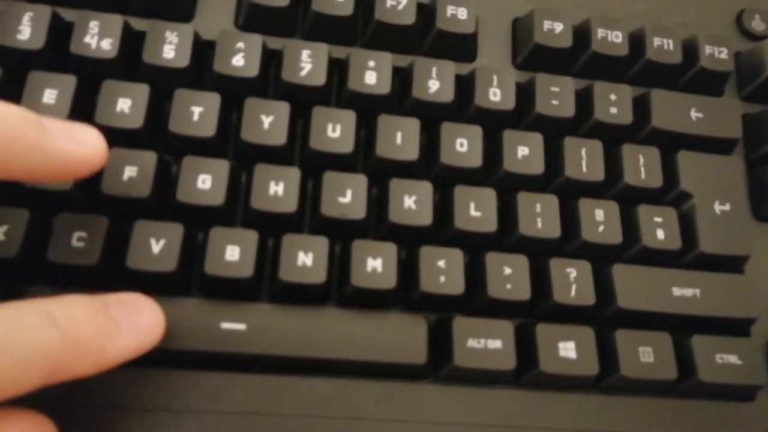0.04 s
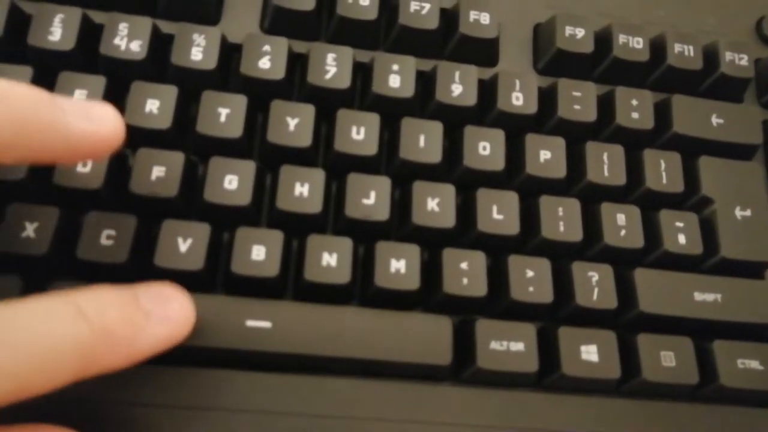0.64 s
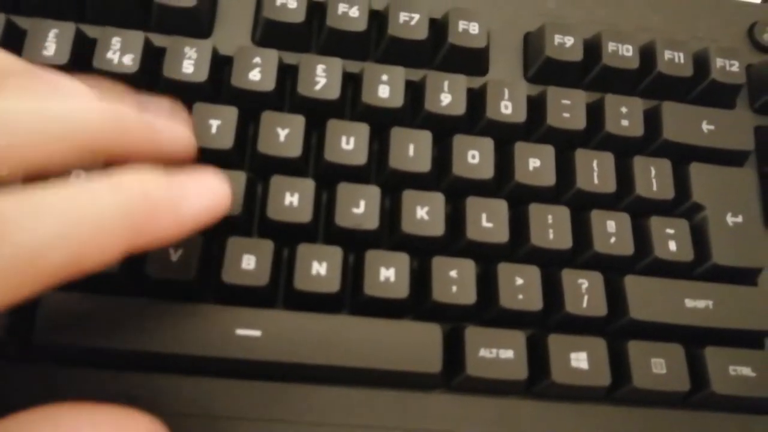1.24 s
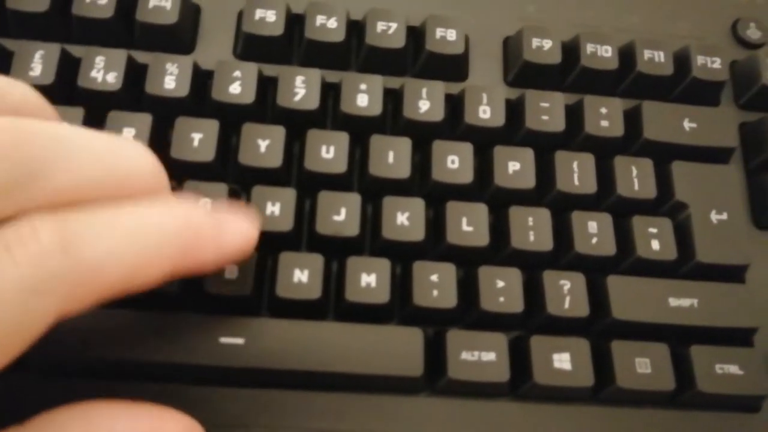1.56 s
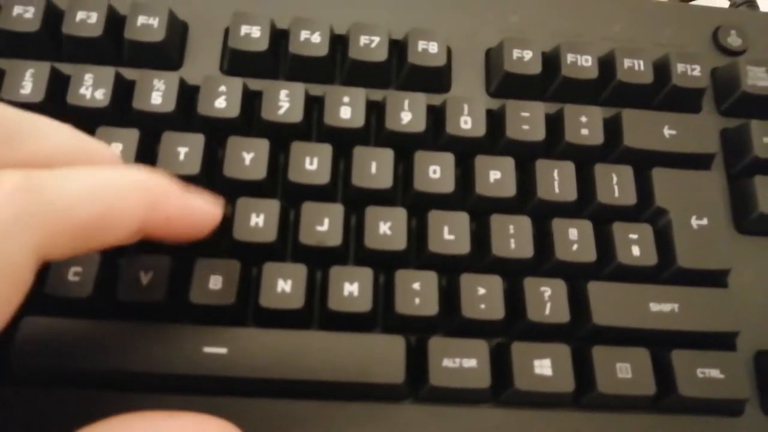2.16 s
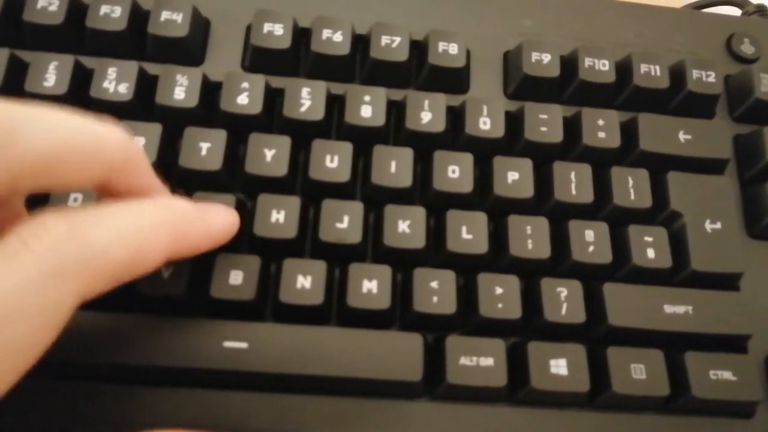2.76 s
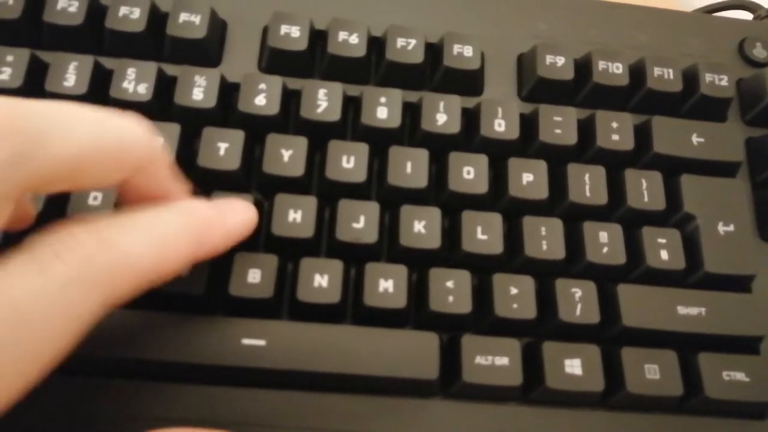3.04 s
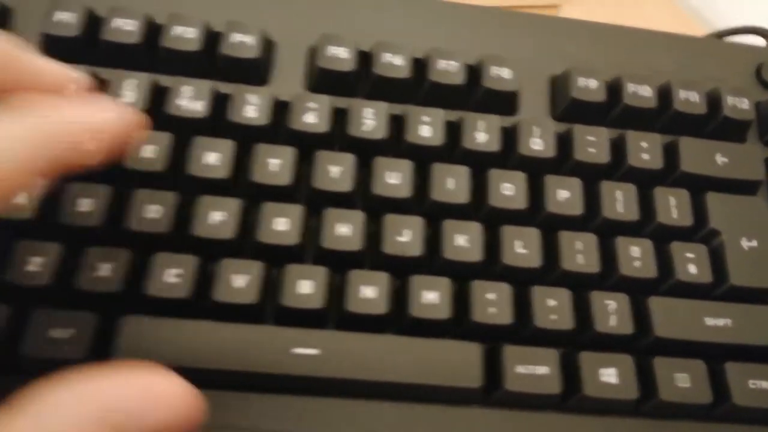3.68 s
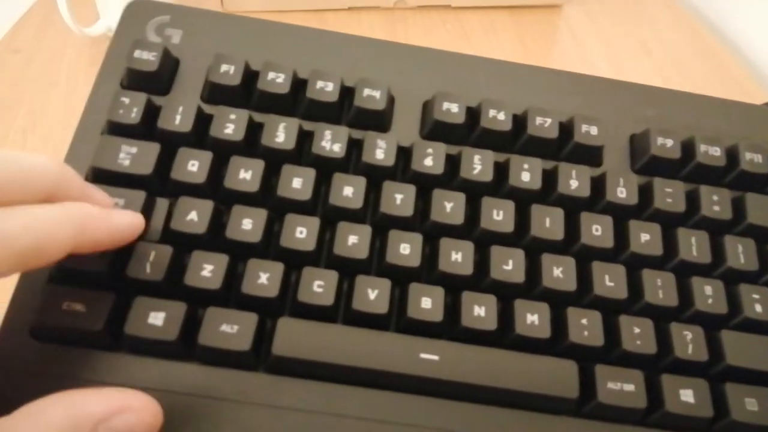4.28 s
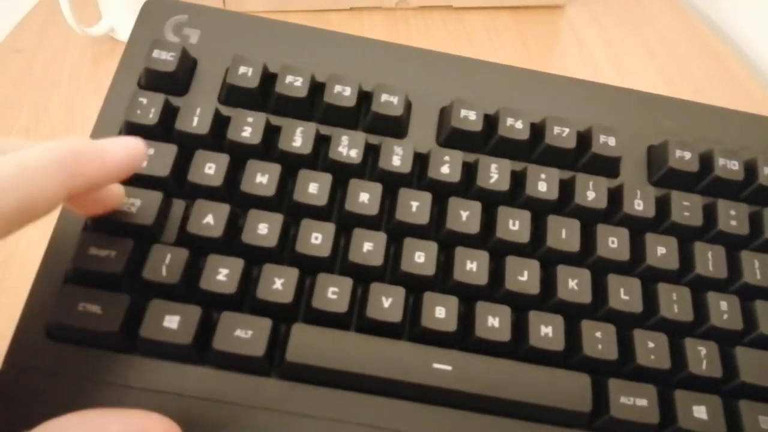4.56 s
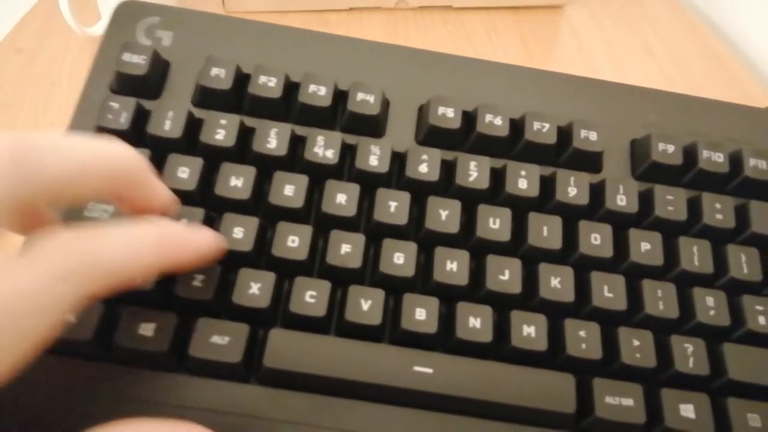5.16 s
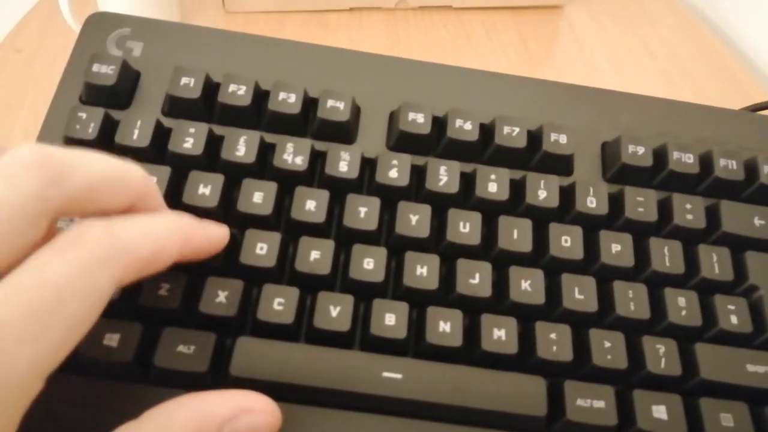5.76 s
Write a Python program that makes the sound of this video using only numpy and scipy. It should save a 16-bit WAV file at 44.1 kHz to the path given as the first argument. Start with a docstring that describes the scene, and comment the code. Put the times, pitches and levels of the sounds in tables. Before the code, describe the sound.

One hand types on a plastic computer keyboard, close to a hand-held microphone in a quiet room. From the start until about 1.2 seconds, the space bar is tapped seven times at an even pace: each stroke is a soft finger thud, then a hollow clack with a tiny wire rattle as the bar snaps up. From 1.4 to 3.7 seconds comes a fast, uneven run of letter keys, each press and release giving a light plastic click and a small knock. After a short pause, a few slower, duller keys sound from about 4.2 to 5.2 seconds, with one low thud near 4.7 seconds, light finger scuffs and a soft rumble from handling the microphone. A couple of faint clicks follow around 5.7 seconds. Throughout, the room gives a slight, short echo over a low steady hiss.

```python
"""One hand typing on a plastic keyboard, close to a hand-held camera in a quiet room.
First seven even space bar clacks: a finger thud, then the hollow bar snaps up and its wire rattles.
From 1.4 s a fast run of letters: each press and release knocks the case and rings a keycap.
A pause at 3.7 s; from 4.2 s a few duller keys at the board's edge, while the moving camera rumbles.
Throughout, the walls answer faintly over a low hiss."""
import sys
import numpy as np
from scipy import signal
from scipy.fft import rfft, irfft, next_fast_len
from scipy.io import wavfile
from scipy.ndimage import uniform_filter1d

SR = 44100
rng = np.random.default_rng(int(sys.argv[2]) if len(sys.argv) > 2 else 0)


def output_pcm(signal):
    """Save a mono or channel-first signal as 16-bit PCM at the path in sys.argv[1].

    Samples are clipped to [-1, 1] before scaling.
    """
    pcm = np.clip(np.atleast_2d(signal).T, -1, 1) * 32767
    wavfile.write(sys.argv[1], SR, np.round(pcm).astype(np.int16))


N = 256662
PREROLL = SR // 5  # samples; typing starts before t = 0
T = np.arange(2048) / SR  # time axis of one contact, s

# letter key down, and up against its stop: t/s, cap level/dB, knock level/dB, cap f/Hz
PRESSES = [(1.393, -40, -47, 3104), (1.5269, -45.5, -53.5, 3200), (1.6684, -55.5, -52, 3010),
           (1.8662, -52.5, -51, 3150), (1.9609, -35, -37.5, 2560), (2.078, -42.5, -44.5, 3100),
           (2.1564, -41, -39.5, 3140), (2.2327, -49.5, -45, 3240), (2.3478, -36, -44, 2460),
           (2.3549, -43, -41.5, 3140), (2.401, -43.5, -45.5, 2220), (2.5016, -45, -56, 2350),
           (2.5197, -45, -46.5, 3140), (2.5415, -49.5, -54.5, 2060), (2.658, -43, -56, 2560),
           (2.6699, -42.5, -48, 3100), (2.7227, -43.5, -48.5, 3080), (2.824, -36, -50, 2590),
           (2.8362, -41, -48.5, 3140), (2.8927, -49, -52, 2100), (2.9966, -40, -56, 2450),
           (3.0033, -43.5, -46.5, 2960), (3.0571, -49, -53.5, 3330), (3.255, -37, -49.5, 2950),
           (3.2745, -44.5, -47, 3130), (3.3503, -43, -49.5, 2500), (3.363, -38.5, -55, 3110),
           (3.4298, -38.5, -42, 2890), (3.5316, -39.5, -54, 2540), (3.5454, -40, -50, 3040),
           (4.2185, -70, -73, 2980), (4.3958, -53.5, -48.5, 3320), (4.487, -69, -58, 3030),
           (4.572, -55, -46.5, 3180), (4.5988, -51, -47.5, 2400), (4.7281, -47.5, -47, 2370),
           (4.904, -45.5, -40.5, 3070), (5.077, -43.5, -40.5, 3030), (5.528, -70, -92, 3070),
           (5.6781, -60, -55.5, 1810)]
RELEASES = [(1.6749, -45, -43.5, 2960), (1.7836, -35.5, -50, 3000), (2.0674, -40, -50, 2420),
            (2.2547, -34, -46.5, 3000), (2.4354, -40, -47, 3150), (2.5982, -38.5, -50, 3070),
            (2.749, -35.5, -50.5, 3030), (2.9171, -38, -47, 3140), (3.0906, -35, -50.5, 3140),
            (3.1742, -41.5, -48, 2720), (3.4512, -35, -47.5, 3140), (3.643, -33.5, -56.5, 3210),
            (4.6686, -43.5, -45, 2400), (4.829, -42.5, -42, 3050), (4.995, -47.5, -41.5, 2800),
            (5.1922, -38.5, -38.5, 2355), (5.7604, -53.5, -45, 3100)]
# space bar snaps up: t/s, reference level/dB
BAR_CLACKS = [(-.094, -25), (.081, -28.5), (.2565, -25.5), (.4307, -26), (.6073, -28), (.7858, -31.5),
              (.9526, -26.5), (1.1279, -29.5)]
# finger thuds: t/s, peak level/dB, f/Hz
THUDS = [(.001, -52, 208), (0.181, -40, 205), (0.3662, -37.5, 198), (0.54, -38.5, 193), (.7225, -39.5, 191),
         (0.888, -35.5, 200), (1.058, -39.5, 195), (1.961, -49.5, 111), (2.158, -46.5, 190),
         (4.6942, -36, 289)]
# finger lands lightly between clacks: t/s, cap level/dB
LANDINGS = [(0.1598, -46), (0.3252, -52.5), (.506, -45), (.6805, -52), (0.8494, -45), (1.0205, -49)]
# timbre of light contacts: plate, knock and tick level/dB re cap, cap f/Hz
RESET_TIMBRE = (-9, -3, 1.5, 3050.5)
BAR_RESET_TIMBRE = (-4.5, -3, -5.5, 2400.5)
LANDING_TIMBRE = (-30, -8, 2, 3117.5)
SEATING_TIMBRE = (-7, 8.5, -5, 2949.5)
# modes of the keyboard's parts: f/Hz, relative level/dB, t60/s
PLATE_MODES = [(180, -2.5, 0.022), (277, -12.5, 0.045), (364, 4.5, 0.054), (405, -5, 0.07)]
CASE_MODES = [(550, -7.5, 0.037), (696, -13, 0.045), (797.4, 6, .032), (890, -12.5, 0.0043)]
CAP_MODES = [(1245, -7.5, 0.0031), (1495, -11, 0.078), (1918, -3.5, 0.015), (2350, 2, 0.0085),
             (2708, 10, 0.0068), (3090, -3, 0.051)]
SWITCH_MODES = [(4810, -9, 0.035), (5300, 1, 0.015), (5890, -0.5, 0.006), (6280, -12.5, 0.0085),
                (6574, -3.5, 0.021)]
BAR_SHELL_MODES = [(190, -7.5, 0.077), (334, -10, 0.053), (599, -12, 0.069), (656, -1, 0.061),
                   (757, 1.5, 0.025), (990, -9, 0.015)]
BAR_CAP_MODES = [(1334, 16, 0.016), (1810, -26, 0.0023), (2400, 3, 0.026), (3140, 13, 0.023)]
BAR_WIRE_MODES = [(5120, -11, 0.013), (5750, -14, 0.0049), (6100, -8, 0.0063), (6460, -9.5, 0.0055),
                  (6966, 1, 0.0076)]
# fingers slide on caps, grip shifts, skin rubs the camera: t/s, hold/s, relative level/dB
SCUFFS = [(1.64, 0.034, -61), (3.97, 0.16, -91), (4.69, .03, -51.5), (4.75, 0.081, -62.5),
          (5.655, 0.012, -69), (5.735, 0.03, -54.5)]
GRIPS = [(.5, 0.075, -59.5), (.93, 0.052, -51), (1.6, 0.046, -63.5), (3.84, .02, -61.5), (4.29, 0.27, -44),
         (4.93, 0.28, -37.5)]
RUBS = [(4.3, 0.1, -60.5), (4.68, 0.049, -54.5)]
# spectra of scuff, rumble, rub, wall echo, air and microphone hiss: f/Hz, relative level/dB
SCUFF_SPECTRUM = [(100, -31), (400, -2), (900, 6.5), (1700, -2), (2800, 3), (4000, -11), (5500, 2.5),
                  (7500, -6)]
RUMBLE_SPECTRUM = [(12, -5), (24, -7), (38, 2.5), (55, -19), (80, -14), (130, -33.5), (300, -71.5),
                   (1000, -100)]
RUB_SPECTRUM = [(100, -37), (210, -7), (265, 3), (330, -12), (500, -22), (2000, -41)]
ROOM_SPECTRUM = [(150, -2.5), (480, -2), (680, -6), (1050, -2.5), (1700, -0.5), (2900, -2.5), (4000, 0),
                 (7000, 0.5)]
HISS_SPECTRUM = [(15, -24), (25, -20.5), (55, -7), (93, -14), (193, -15.5), (272, -20), (293, -17.5),
                 (465, -22), (814, -23), (897, -30.5), (5570, -38), (8430, -44), (11000, -56.5),
                 (18500, -120)]
# tail decay: f/Hz, t60/s; near 690 Hz the board itself keeps ringing
ROOM_T60 = [(200, .28), (480, .33), (690, .56), (1100, .33), (2800, .34), (7000, .33)]


def keys(contacts, plate_lag_s=0.0021, at_edge_s=4.0):
    """Each contact ticks the switch, rings the cap, knocks the case, then thumps the base plate."""
    t_s, plate_db, knock_db, cap_db, tick_db, cap_hz = columns(contacts)
    force = impact(t_s, chatter=0.77, fade_s=0.0027)
    cap_mode = gain_of(11 - 60 * T / 0.015) * np.cos(2 * np.pi * cap_hz * T)
    plate = ring(PLATE_MODES, force, detune=0.029, dense=2.3, dense_t60_s=0.21, crack=0.14)
    case = ring(CASE_MODES, force, detune=0.077, dense=3.55, dense_t60_s=0.06, crack=0.13)
    cap = ring(CAP_MODES, force, detune=0.03, dense=0.8, dense_t60_s=0.024, crack=0.45, extra=cap_mode)
    tick = ring(SWITCH_MODES, force, detune=0.025, dense=0.85, dense_t60_s=0.024, crack=0.25)
    # duller once the hand is at the board's edge
    knock = np.where(t_s < at_edge_s, band(case, 520, 1300), band(case, 440, 960))
    click = (at_level(knock, knock_db)
             + at_level(band(cap, 1300, 3450), cap_db)
             + at_level(band(tick, 4500, 8500), tick_db))
    thump = at_level(band(plate, 110, 520), plate_db)
    return place(t_s, click) + place(t_s + plate_lag_s, thump)


def stroke(t_s, cap_db, knock_db, cap_hz, tick_rel_db, ordinary_db=-45):
    """Full stroke: the tick follows the cap, the plate follows the overall force."""
    force_db = (cap_db + knock_db) / 2 - ordinary_db
    plate_db = -54 + 0.55 * force_db
    return t_s, plate_db, knock_db, cap_db, cap_db + tick_rel_db, cap_hz


def touch(t_s, cap_db, timbre):
    """Light contact with the timbre of its kind."""
    plate_rel_db, knock_rel_db, tick_rel_db, cap_hz = timbre
    return t_s, cap_db + plate_rel_db, cap_db + knock_rel_db, cap_db, cap_db + tick_rel_db, cap_hz


def key_contacts(reset_lead_s=0.01, seat_lag_s=0.0135):
    """All contacts. A rising key resets its switch before the stop; a key seats after each thud."""
    return ([stroke(*row, tick_rel_db=-4.5) for row in PRESSES]
            + [stroke(*row, tick_rel_db=-3) for row in RELEASES]
            + [touch(t_s - reset_lead_s, db - 19, RESET_TIMBRE) for t_s, db, _, _ in RELEASES]
            + [touch(t_s - reset_lead_s, db - 21.5, BAR_RESET_TIMBRE) for t_s, db in BAR_CLACKS]
            + [touch(t_s, db, LANDING_TIMBRE) for t_s, db in LANDINGS]
            + [touch(t_s + seat_lag_s, db - 20, SEATING_TIMBRE) for t_s, db, _ in THUDS])


def space_bar(knock_hz=780, knock_s=0.00051, lag_s=0.0012, rattle_s=0.0025):
    """The bar flexes once; its cap rings, its stabiliser wire rattles, the rebound rings its shell."""
    t_s, db = columns(BAR_CLACKS)
    flex_s = T - lag_s
    knock = -np.cos(2 * np.pi * knock_hz * flex_s) * np.exp(-0.5 * (flex_s / knock_s) ** 2)
    shell_force = impact(t_s, chatter=0.33, fade_s=0.011)
    shell = ring(BAR_SHELL_MODES, shell_force, detune=0.016, dense=1.64, dense_t60_s=0.051, crack=0.4)
    cap_force = impact(t_s, chatter=1.16, fade_s=0.0041)
    cap = ring(BAR_CAP_MODES, cap_force, detune=0.049, dense=0.88, dense_t60_s=0.023, crack=0.19)
    shake = rng.standard_normal((len(t_s), len(T))) ** 3 * (T / rattle_s) ** 2 * np.exp(-T / rattle_s)
    wire = ring(BAR_WIRE_MODES, shake, detune=0.0073, dense=0.087, dense_t60_s=0.008, crack=0.73)
    clack = (at_level(knock, db - 3.5)
             + at_level(band(cap, 1200, 3350), db - 8)
             + at_level(band(wire, 4700, 7500), db - 8))
    hollow = at_level(band(shell, 150, 1600), db - 9)
    rebound_s = lag_s + 0.5 / knock_hz
    return place(t_s, clack) + place(t_s + rebound_s, hollow)


def impact(times_s, chatter, fade_s):
    """Force per stroke: one sharp hit, then loose plastic chattering."""
    bounces = rng.standard_normal((len(times_s), len(T))) ** 3 * np.exp(-T / fade_s)
    return (T == 0) + chatter * bounces / np.linalg.norm(bounces, axis=1, keepdims=True)


def ring(modes, force, detune, dense, dense_t60_s, crack, extra=0, spread_db=2.5):
    """Struck part: clear modes varied per stroke, dense weak modes and a dry crack."""
    clear = extra
    for hz, db, t60_s in modes:
        weight, shift = columns(rng.standard_normal((len(force), 2)))
        envelope = gain_of(db + spread_db * weight - 60 * T / t60_s)
        clear = clear + envelope * np.cos(2 * np.pi * hz * (1 + detune * shift) * T)
    weak = rng.standard_normal(force.shape) * gain_of(-60 * T / dense_t60_s)
    response = at_level(clear, 0) + dense * at_level(weak, 0) + crack * at_level(T == 0, 0)
    return signal.fftconvolve(force, response, axes=1)[:, :len(T)]


def thuds(rise_s=0.0013, fade_s=0.0052):
    """A fingertip pushes the board against the desk: a few low cycles."""
    t_s, db, hz = columns(THUDS)
    envelope = (1 - np.exp(-T / rise_s)) ** 2 * np.exp(-T / fade_s)
    return place(t_s, -gain_of(db) * envelope / envelope.max() * np.sin(2 * np.pi * hz * T))


def key_wobble(contacts, rel_db=-19, scrape_s=0.008, loose_s=0.03):
    """The stem scrapes in its guide before each contact; the loose cap ticks after it."""
    t_s, _, _, cap_db, _, _ = columns(contacts)
    friction = rng.standard_normal((len(t_s), len(T))) * np.exp(-T / scrape_s)
    scrape = band(friction, 900, 9200)[:, ::-1]  # reversed: swells into the contact
    lag, size = columns(rng.standard_normal((len(t_s), 2)))
    force = impact(t_s, chatter=0.93, fade_s=0.0027)
    tick = ring(CAP_MODES + SWITCH_MODES, force, detune=0.075, dense=0.48, dense_t60_s=0.0065, crack=0.22)
    return (place(t_s - T[-1], at_level(scrape, cap_db + rel_db))
            + place(t_s + loose_s * abs(lag), at_level(tick, cap_db + rel_db + 3 * size)))


def scuff(grain_db=3, resting_db=-75):
    """Skin catches and slips on matt caps: grainy hiss, a trace of it even at rest."""
    grain = uniform_filter1d(rng.standard_normal(N), size=130)
    friction = noise(SCUFF_SPECTRUM) * gain_of(grain_db * grain / grain.std())
    return (gain_of(resting_db) + swells(SCUFFS)) * friction / friction.std()


def handling(steady_db=-74, grip_trim_db=-5):
    """The hand shifts on the camera: low rumble, soft rub."""
    grips = gain_of(grip_trim_db) * swells(GRIPS, attack_s=0.035, fade_db_per_s=41)
    rumble = (gain_of(steady_db) + grips) * noise(RUMBLE_SPECTRUM)
    return rumble + swells(RUBS) * noise(RUB_SPECTRUM)


def walls(x, gap_s=0.0097, build_s=0.027):
    """Diffuse tail after a short gap; each band decays at its own rate."""
    hz, t_s, bins = signal.stft(rng.standard_normal(SR), SR, nperseg=256)
    decay_db = 60 * t_s / log_interp(ROOM_T60, hz)[:, None]
    bins = bins * gain_of(log_interp(ROOM_SPECTRUM, hz)[:, None] - decay_db)
    tail = signal.istft(bins, SR, nperseg=256)[1]
    tail *= np.clip((np.arange(len(tail)) / SR - gap_s) / build_s, 0, 1)
    return signal.fftconvolve(x, tail / np.linalg.norm(tail))[:len(x)]


def hiss(level_db=-71.1):
    """Still air and microphone noise."""
    return gain_of(level_db) * noise(HISS_SPECTRUM)


def noise(spectrum):
    """Steady shaped noise, rms 1."""
    size = next_fast_len(N, real=True)
    shape = gain_of(log_interp(spectrum, np.fft.rfftfreq(size, 1 / SR)))
    x = irfft(rfft(rng.standard_normal(size)) * shape, size)[:N]
    return x / x.std()


def swells(events, attack_s=0.019, fade_db_per_s=234):
    """Gain per sample: each event rises, holds, fades."""
    t_s = np.arange(N) / SR
    gain = np.zeros(N)
    for start_s, hold_s, db in events:
        rise = np.clip((t_s - start_s) / attack_s, 0, 1)
        gain += rise * gain_of(db - fade_db_per_s * np.maximum(t_s - start_s - hold_s, 0))
    return gain


def place(times_s, sounds):
    """Sum timed sounds on a track that starts PREROLL samples early."""
    track = np.zeros(N + PREROLL)
    for t_s, sound in zip(np.ravel(times_s), sounds):
        start = max(round(t_s * SR) + PREROLL, 0)
        span = track[start:start + len(sound)]
        span += sound[:len(span)]
    return track


def at_level(x, db):
    """Scale each sound so its energy, spread over 10 ms, has this level."""
    return x * gain_of(db) / np.sqrt(np.sum(x ** 2, -1, keepdims=True) / (SR / 100) + 1e-20)


def band(x, lo_hz, hi_hz):
    """Band in which a part radiates."""
    return signal.sosfilt(signal.butter(2, [lo_hz, hi_hz], "band", fs=SR, output="sos"), x)


def gain_of(db):
    """dB to amplitude."""
    return 10 ** (np.asarray(db) / 20)


def log_interp(table, hz):
    """Interpolate on a log-frequency axis."""
    table_hz, values = np.transpose(table)
    return np.interp(np.log(hz + 1), np.log(table_hz + 1), values)


def columns(table):
    """Event columns, shaped to broadcast against T."""
    return np.transpose(table)[:, :, None]


def scene(wet_db=-12.5, bar_to_walls_db=-0.5):
    """Mono mix. The keyboard radiates differently to front and back; both walls answer."""
    contacts = key_contacts()
    soft = key_wobble(contacts) + thuds()
    front, back = keys(contacts) + soft, keys(contacts) + soft
    bar_front, bar_back = space_bar(), space_bar()
    bar_send = gain_of(bar_to_walls_db)
    echo = (walls(front + bar_send * bar_front) + walls(back + bar_send * bar_back)) / np.sqrt(2)
    typing = (front + bar_front + gain_of(wet_db) * echo)[PREROLL:]
    return (typing + scuff() + handling() + hiss())[None]


def record(dry, cutoff_hz=7580):
    """Steep low-pass of the recorder."""
    lowpass = signal.firwin(191, cutoff_hz, window=("kaiser", 3.5), fs=SR)
    return signal.oaconvolve(dry, lowpass[None], "same")


dry = scene()
out = record(dry)
output_pcm(out)
```